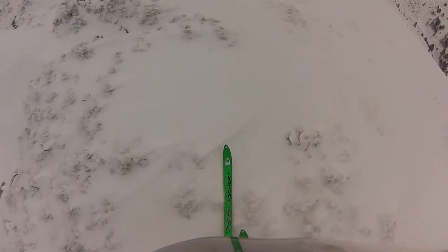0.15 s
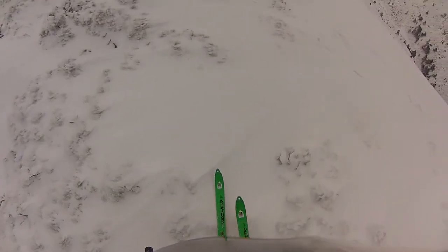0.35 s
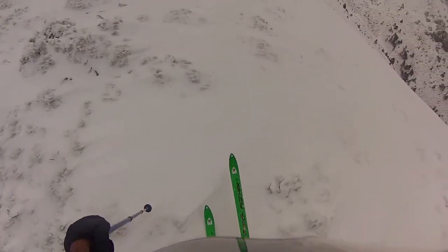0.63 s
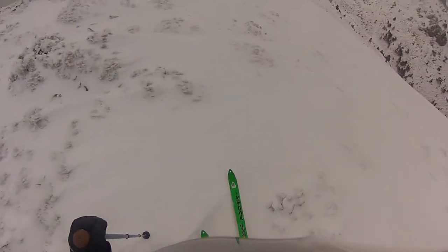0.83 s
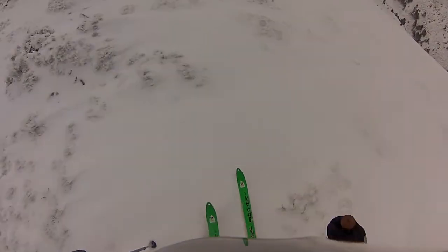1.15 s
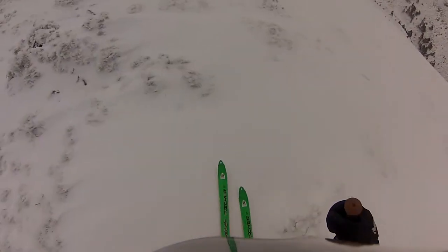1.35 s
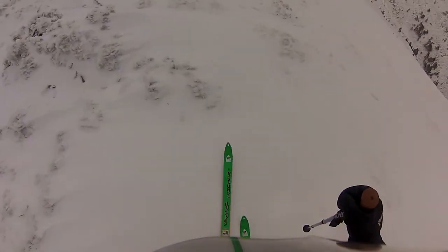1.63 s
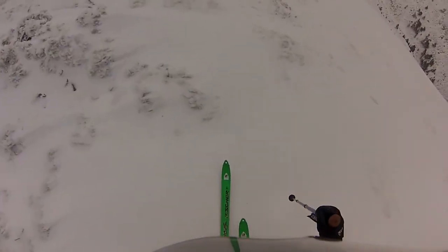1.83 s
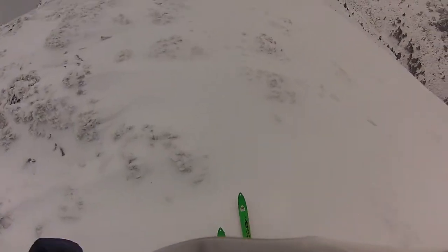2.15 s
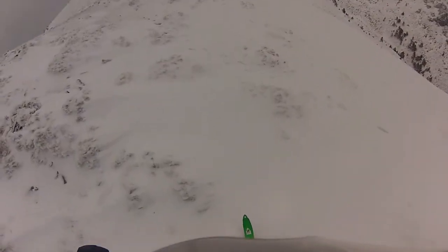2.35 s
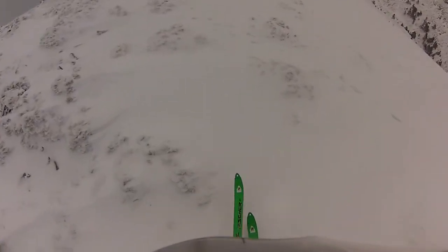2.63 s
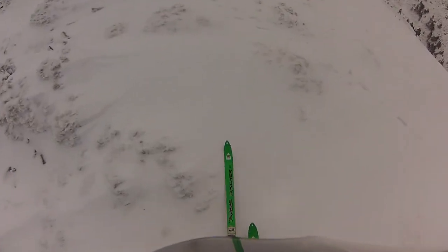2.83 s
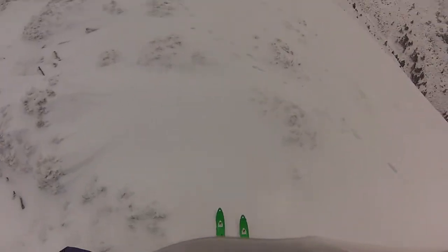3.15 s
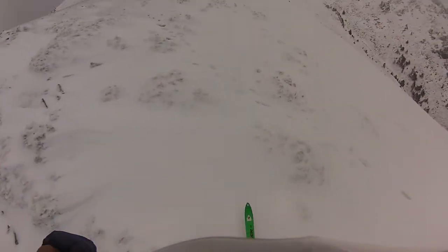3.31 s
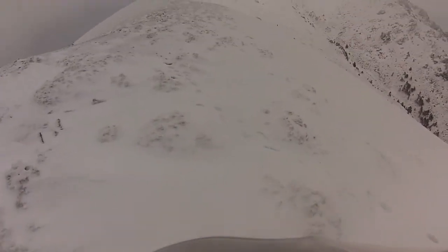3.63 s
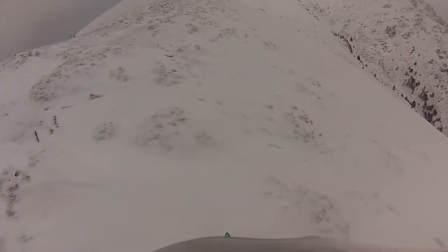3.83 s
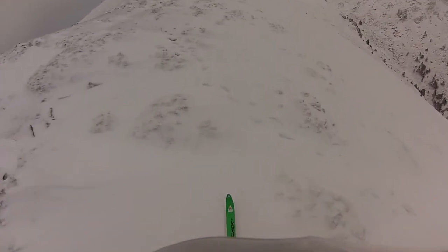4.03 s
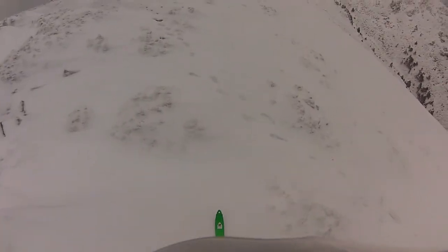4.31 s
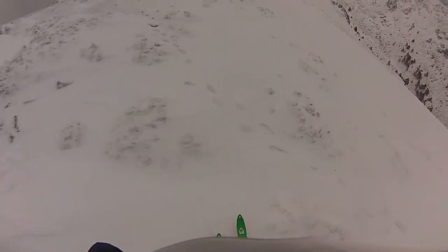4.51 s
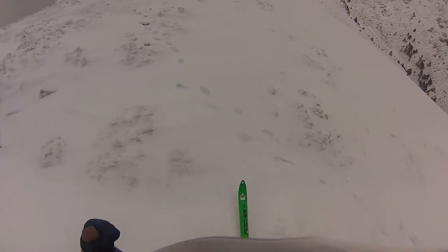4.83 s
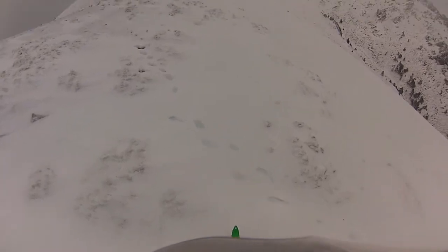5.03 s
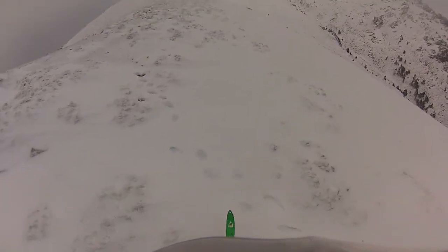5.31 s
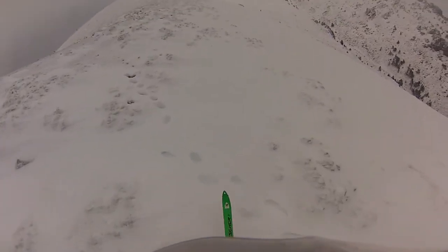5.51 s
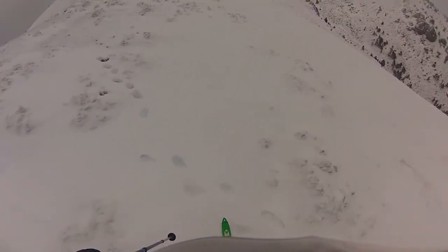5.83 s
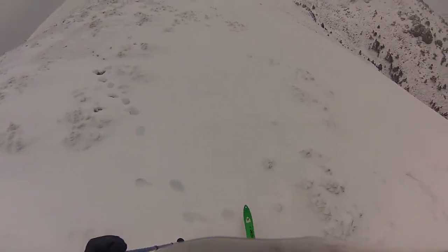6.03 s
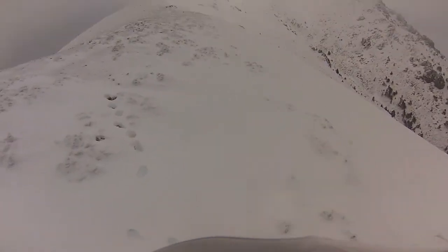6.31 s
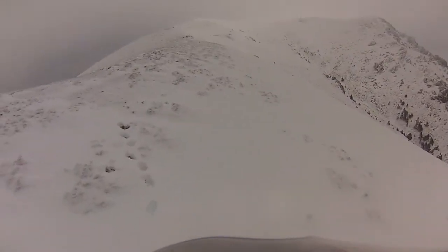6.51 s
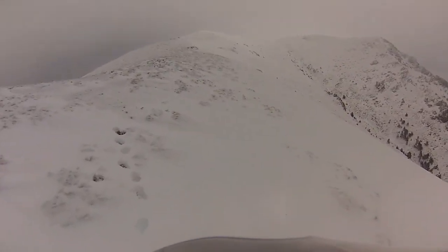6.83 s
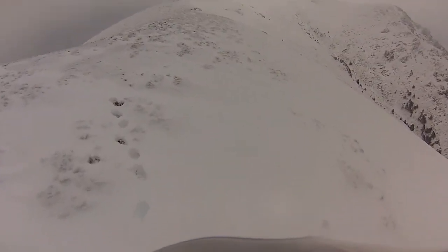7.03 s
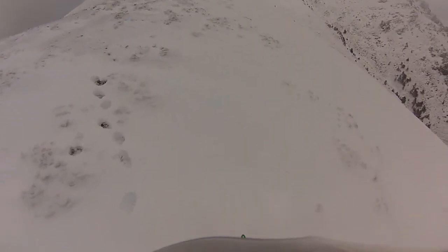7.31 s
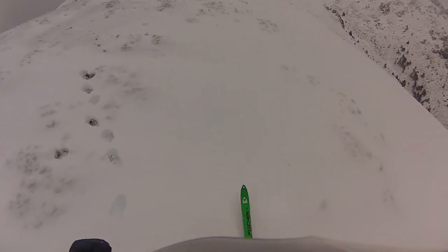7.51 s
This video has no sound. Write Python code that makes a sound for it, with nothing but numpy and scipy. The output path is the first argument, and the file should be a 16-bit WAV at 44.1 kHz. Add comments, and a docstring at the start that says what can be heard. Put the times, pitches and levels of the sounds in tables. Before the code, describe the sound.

Skis crunch and creak over crusted snow in steady strides, with sharp little snaps and low wind buffeting the microphone.

```python
"""A ski tourer climbs crusted snow in twelve strides, heard from a camera worn on the body.
In each stride the ski slides and bites, crunching by stick-slip and grain fracture; then the body
lurches and air buffets the housing. Loose metal gear clacks in the first two strides. From midway
the housing knocks on its mount and a hinge chirps twice; the sharpest crack comes near the end.
Throughout, snow creaks in shear, the crust snaps, footfalls jolt the camera and wind rumbles."""
import sys
import numpy as np
from scipy import signal
from scipy.fft import rfft, irfft, next_fast_len
from scipy.io import wavfile
from scipy.ndimage import uniform_filter1d

SR = 44100
rng = np.random.default_rng(int(sys.argv[2]) if len(sys.argv) > 2 else 0)


def persist_wave(psi):
    """Save psi, clipped to +-1, as 16-bit WAV."""
    counts = np.round(np.clip(psi, -1, 1) * 32767).astype(np.int16)
    wavfile.write(sys.argv[1], SR, np.atleast_2d(counts).T)


N = 337806
TIME = np.arange(N) / SR

# Spectra of the crunch as coloured by the camera housing, and of friction on the ski base: f/Hz, level/dB
CRUNCH_SPECTRUM = [(300, -17.5), (470, -16.5), (590, -5.5), (760, -11), (900, -17.5), (1080, -15),
                   (1240, -3.5), (1520, -1), (1750, -7), (2180, -4.5), (2520, -12.5), (2850, -22)]
HISS_SPECTRUM = [(2850, -18), (3150, -3), (3450, 1.5), (3750, -4.5), (4120, -1), (4450, -13), (5000, -3.5),
                 (5650, -17.5), (6900, -11), (7830, -14.5), (8480, -20), (11500, -17.5), (14700, -27),
                 (16000, -53)]
def skis(grain_db=-1.5, crunch_gain_db=0.08, rub_db=-56, creak_db=-48, dull_above_db=-67, dulling=0.073):
    """Stick-slip and brittle fracture: snow packs in spurts, which also make the ski base hiss."""
    crunch_db, hiss_db = ski_levels()
    packing = spurts(per_s=40, t60=0.12, depth=0.37)
    creaks = squeaks(per_s=120, low_hz=1200, high_hz=2404, swell_s=0.0019, spread_db=2.5, rough=0.079)
    breaks = coloured(grains(per_s=340, spread_db=1), CRUNCH_SPECTRUM)
    crunch = rms_one(coloured(creaks, CRUNCH_SPECTRUM)) + from_db(grain_db) * rms_one(breaks)
    crunch = evened(packing * crunch, window_s=0.067)
    # only a loaded ski makes the snow creak; a light one rubs over it
    rub = rubbing(rate_hz=15, spread_db=2.6, split_hz=1800)
    loaded = np.clip((crunch_db - rub_db) / (creak_db - rub_db), 0.25, 1)
    crunch = np.sqrt(loaded) * crunch + np.sqrt(1 - loaded) * rub
    hiss = coloured(grains(per_s=3500, spread_db=3), HISS_SPECTRUM)
    hiss = from_db(hiss_db) * evened(packing * hiss, window_s=0.14)
    # load presses the snow shut, so the hiss grows duller as it grows louder
    open_share = from_db(-dulling * np.maximum(hiss_db - dull_above_db, 0))
    hiss = open_share * hiss + (1 - open_share) * filtered(hiss, "low", hz=4500, order=1)
    return from_db(crunch_db + crunch_gain_db) * crunch + hiss


# Light rubbing of the unloaded ski: t/s, base level/dB
GLIDE_CURVE = [(0.0, -68), (0.45, -58), (1.71, -54), (2.0, -59), (2.77, -55.5), (4.29, -60), (5.2, -58.5),
               (5.72, -54), (5.87, -56.5), (6.93, -52.5), (7.3, -58), (7.66, -53)]
# Slides and lurches: t/s, slide length/s, rub level/dB, lurch lag/s, buffet level/dB, rumble level/dB
STRIDE_EVENTS = [(0.142, 0.14, -56.5, 0.052, -34, -39), (0.774, 0.086, -55.5, 0.17, -33, -45.5),
                 (1.433, .25, -56, 0.062, -37.5, -47), (2.216, 0.24, -55, 0.08, -29, -37),
                 (2.845, 0.15, -52.5, 0.066, -33, -36.5), (3.445, 0.14, -55, 0.125, -26.5, -37.5),
                 (4.03, 0.14, -57, 0.16, -28.5, -37), (4.811, 0.09, -52, 0.075, -24.5, -38),
                 (5.601, 0.16, -51, 0.11, -24, -34), (6.219, 0.086, -49.5, 0.11, -25.5, -35.5),
                 (6.742, 0.42, -56, 0.11, -32, -37.5), (7.56, .08, -62, 0.089, -40.5, -45)]
# The loaded ski bites into the snow: t/s, length/s, crunch level/dB, hiss level/dB
SKI_BITES = [(0.008, 0.011, -41.5, -53.5), (0.744, 0.013, -52, -58), (0.895, 0.026, -52.5, -66),
             (1.414, 0.023, -52, -63), (1.484, 0.031, -51, -61.5), (1.582, 0.025, -58.5, -61.5),
             (1.638, 0.015, -52, -70), (1.797, 0.089, -55.5, -67), (2.241, 0.07, -49.5, -61),
             (2.391, 0.019, -48, -64), (2.852, 0.047, -45, -54.5), (3.45, 0.053, -52.5, -71),
             (3.503, 0.064, -48.5, -58), (3.637, 0.016, -48.5, -64), (4.056, 0.03, -49, -61.5),
             (4.138, 0.11, -52, -64), (4.35, 0.078, -59.5, -72), (4.788, 0.079, -49.5, -61.5),
             (5.39, 0.011, -52, -67), (5.489, 0.05, -51.5, -67), (5.674, 0.023, -43, -54),
             (6.194, 0.019, -45, -69), (6.31, 0.022, -44, -57.5), (6.411, 0.037, -47.5, -68),
             (6.785, 0.099, -50.5, -65), (6.847, 0.063, -52.5, -71), (6.943, 0.041, -49, -78),
             (7.591, 0.032, -49, -56.5)]
def ski_levels(slide_hiss_db=-12.5):
    """Friction noise follows load: the loudest of glide, slide and bite sets crunch and hiss, in dB."""
    glide_db = in_time(GLIDE_CURVE)
    crunch, hiss = glide_db - 3.5, glide_db - 16.5
    for s, length_s, rub_db, *_ in STRIDE_EVENTS:
        slide = rub_db + swell(s, length_s, rise_db_per_s=186, fall_db_per_s=118)
        crunch, hiss = np.maximum(crunch, slide), np.maximum(hiss, slide + slide_hiss_db)
    for s, length_s, crunch_db, hiss_db in SKI_BITES:
        load = swell(s, length_s, rise_db_per_s=900, fall_db_per_s=382)
        crunch, hiss = np.maximum(crunch, crunch_db + load), np.maximum(hiss, hiss_db + load)
    return crunch, hiss


def spurts(per_s, t60, depth):
    """Relaxation: snow yields in spurts that start at once and decay, over a steady share."""
    starts = np.abs(grains(per_s, spread_db=4.5))
    return 1 + depth * signal.lfilter([1], [1, -from_db(-60 / (t60 * SR))], starts)


def squeaks(per_s, low_hz, high_hz, swell_s, spread_db, rough):
    """Stick-slip locks onto a pitch for milliseconds: a random stream of tiny squeaks."""
    out, t = np.zeros(N), TIME[:SR // 30]
    for when, pitch, length, strength in rng.random((int(per_s * N / SR), 4)):
        hz = low_hz * (high_hz / low_hz) ** pitch
        squeak = tone_burst(t, hz, swell_s * 2 ** (2 * length - 1), rough)
        add(out, when * N / SR, from_db(-spread_db * np.log(strength + 0.02)) * squeak)
    return rms_one(out)


def rubbing(rate_hz, spread_db, split_hz):
    """Sliding friction: as the ski meets new snow, the low and high bands swell and fade separately."""
    rub = coloured(grains(per_s=5000, spread_db=2), CRUNCH_SPECTRUM)
    low = filtered(rub, "low", split_hz, order=3) * from_db(spread_db * drift(rate_hz))
    high = filtered(rub, "high", split_hz, order=3) * from_db(spread_db * drift(rate_hz))
    return rms_one(low + high)


# Snow gives way under the ski: t/s, peak level/dB, f/Hz, t60/s
SNOW_SLIPS = [(0.074, -42, 1480, 0.046), (0.42, -41.5, 1400, 0.12), (0.776, -45.5, 1450, 0.05),
              (0.791, -40, 1530, 0.06), (0.888, -36.5, 1650, 0.036), (1.483, -37, 1587, 0.08),
              (1.628, -38, 1640, 0.05), (2.146, -45, 2120, 0.045), (2.677, -43.5, 2100, 0.045),
              (2.762, -40, 1490, 0.054), (2.886, -33, 1560, 0.076), (3.263, -44, 2180, 0.12),
              (3.332, -42, 1380, 0.054), (3.430, -40, 1490, 0.039), (3.502, -35, 1300, 0.037),
              (3.524, -37.5, 1890, 0.05), (3.574, -36.5, 3460, .06), (4.013, -39.5, 1460, 0.088),
              (4.06, -41, 2060, 0.093), (4.117, -28, 1586, 0.036), (4.159, -35.5, 1844, 0.077),
              (4.700, -36.5, 1340, 0.082), (4.783, -42.5, 1860, 0.042), (4.816, -38, 1280, 0.09),
              (4.872, -39, 1495, 0.088), (5.47, -40.5, 1525, 0.059), (5.609, -39, 1440, 0.06),
              (5.674, -38, 1330, 0.085), (5.699, -34.5, 1980, 0.019), (6.095, -36.5, 1475, 0.072),
              (6.312, -35.5, 1490, 0.071), (6.412, -37.5, 1390, 0.11), (6.780, -37.5, 1573, 0.099),
              (7.24, -36, 1540, 0.022), (7.399, -42.5, 1370, 0.084), (7.586, -40, 1450, 0.095),
              (7.636, -38, 1490, 0.043)]
# Spectrum of the dull creak: f/Hz, level/dB
CREAK_SPECTRUM = [(550, -13), (950, -28), (1120, -26), (1300, -22), (1600, 9), (2200, 10), (2850, -5.5),
                  (3450, -6.5), (5000, -20.5), (7000, -38)]
def slips(swell_share=0.049, first_jerk=1.6, rasp_db=-13):
    """Shear failure: a layer slips with a jerk and a squeak, then smaller jerks rasp on the ski base."""
    out, t = np.zeros(N), TIME[:SR // 10]
    for s, db, hz, t60 in SNOW_SLIPS:
        jerks = grains(per_s=1500, spread_db=3.5, size=len(t)) * dying(t, t60)
        jerks[0] += first_jerk
        creak = struck(jerks, CREAK_SPECTRUM) + struck(jerks, HISS_SPECTRUM, rasp_db)
        squeak = tone_burst(t, hz, swell_share * t60, rough=0.078)
        add(out, s, from_db(db) * peak_one(squeak + creak))
    return out


# The crust snaps: t/s, crack level/dB, body level re crack before its boost/dB, body f/Hz, crumb t60/s
CRUST_SNAPS = [(0.5574, -65.5, 15.5, 4900, 0.031), (0.633, -41.5, -13.5, 3400, 0.018),
               (0.643, -46, -10, 2500, 0.012), (0.7915, -43, -16, 4700, 0.014),
               (0.7997, -40.5, -13, 4720, 0.016), (0.8207, -42, -18, 3400, 0.012),
               (0.9029, -31.5, -9, 2700, 0.015), (1.358, -46, -21, 4780, 0.055),
               (1.648, -42, -11.5, 3330, 0.1), (1.7937, -35, -10.5, 3400, 0.011),
               (1.8655, -33.5, -2, 3470, 0.009), (1.9333, -46, -10, 4620, 0.021),
               (1.952, -46, -12, 4800, 0.03), (1.968, -44, -5.5, 3360, 0.075),
               (2.1096, -51, -4, 5000, 0.016), (2.1752, -35.5, -12, 2200, 0.021),
               (2.2656, -40, -6, 3400, 0.048), (2.7192, -37.5, -5.5, 3420, 0.017),
               (2.7668, -45, -6, 5100, 0.031), (2.9894, -39.5, -2, 3440, 0.012),
               (3.052, -31.5, -10, 3380, 0.0079), (3.13, -47.5, -10, 3590, 0.028),
               (3.269, -48, -4.5, 4500, 0.038), (3.404, -50.5, -4, 4800, 0.03), (3.574, -58, 4, 3460, 0.06),
               (3.681, -43.5, -1.5, 3700, 0.055), (4.02, -45, -13, 3520, 0.025),
               (4.42, -46.5, -9, 3460, 0.13), (4.567, -38.5, -4, 5360, 0.024),
               (5.153, -53.5, -4, 4900, 0.04), (5.174, -42.5, -15, 3570, 0.013),
               (5.2399, -32.5, -8, 3270, 0.0071), (5.2483, -47, -6, 4800, 0.012),
               (5.347, -43.5, -10, 3270, 0.011), (5.745, -50, 6, 3450, 0.0085),
               (5.7805, -44, -6, 3450, 0.046), (5.906, -43.5, -5, 3400, 0.017),
               (5.9645, -41, -13, 3410, 0.011), (6.056, -43, -9.5, 5070, 0.036),
               (6.122, -45, -22, 3670, 0.027), (6.181, -49.5, 0.5, 4430, 0.012),
               (6.371, -44.5, -9, 3400, 0.012), (6.4638, -22.5, -31, 2050, 0.012),
               (6.5156, -49, -5, 3460, 0.025), (6.7195, -44.5, -1, 4150, 0.017),
               (6.773, -49.5, -1.5, 4700, 0.031), (7.066, -51, -1, 3820, 0.02),
               (7.1493, -32, -4, 3460, 0.0079), (7.246, -42.5, -5, 5000, 0.024),
               (7.566, -41.5, -9, 3370, 0.016)]
# Spectra of a snap's body and of its bright crack: f/Hz, level/dB
BODY_SPECTRUM = [(600, -15), (1100, -28), (1500, -25), (2500, 3), (2900, -5.5), (3350, 0), (4200, -6),
                 (4900, 1), (5700, -12), (8000, -12)]
CRACK_SPECTRUM = [(3000, -24), (5500, -13), (6900, -3.5), (7900, -5), (8800, -9.5), (9700, -7.5),
                  (12000, -9), (15000, -22)]
def snaps(travel_s=0.0014, splinter_db=-1, crumb_db=-11, body_boost_db=9.5, knock_db=-14, lag_s=0.0006):
    """Brittle fracture: a crack runs through the crust and knocks on the ski, then crumbs scatter."""
    out, t = np.zeros(N), TIME[:SR // 10]
    # dispersion: the crust carries treble faster than bass, so the break arrives as a falling sweep
    sweep = (t < travel_s) * np.cos(np.pi * SR * t * (1 - t / (2 * travel_s)))
    for s, db, body_db, hz, t60 in CRUST_SNAPS:
        splinters = from_db(splinter_db) * rng.standard_normal(len(t)) * dying(t, t60=0.0053)
        crack = sweep + splinters
        crumbs = grains(per_s=5400, spread_db=6.5, size=len(t)) * dying(t, t60)
        force = crack + from_db(crumb_db) * crumbs
        resonance = peaked(BODY_SPECTRUM, hz, peak_db=9.5, octaves=0.16)
        add(out, s + lag_s, struck(force, CRACK_SPECTRUM, db))
        add(out, s + lag_s, struck(force, resonance, db + body_db + body_boost_db))
        add(out, s + lag_s, struck(crack[:SR // 50], CREAK_SPECTRUM, db + knock_db))
    return out


# Footfalls: t/s, shudder level/dB, shudder f/Hz, lump level re shudder/dB
FOOTFALLS = [(0.012, -45, 110, 14), (0.19, -38, 123, -17), (0.915, -39, 86.5, -1.5), (1.482, -42, 113, 0),
             (2.390, -34.5, 97, -6.5), (2.885, -42, 95, 4), (3.502, -32.5, 85, 2), (3.543, -36, 138, -7),
             (3.623, -32, 111.6, -11), (4.232, -32, 105, -21), (4.876, -42.5, 102, 1),
             (5.654, -26, 112.7, -14.5), (6.334, -32.5, 124, -9), (6.428, -35, 85, -9)]
def jolts(t60=0.093, shake_db=-7, mount_t60=0.12, rise_s=0.01, upper_hz=195, upper_db=-11):
    """Damped oscillation: a footfall shakes the camera on its springy mount and breaks lumps of crust."""
    out, t = np.zeros(N), TIME[:SR // 4]
    for s, db, hz, lumps_db in FOOTFALLS:
        modes = np.sin(2 * np.pi * hz * t) + from_db(upper_db) * np.sin(2 * np.pi * upper_hz * t)
        shudder = modes * dying(t, mount_t60) * (1 - np.exp(-t / rise_s))
        shake = filtered(rng.standard_normal(len(t)) * dying(t, t60), "low", hz=300, order=1)
        lumps = grains(per_s=820, spread_db=3, size=len(t)) * dying(t, t60)
        add(out, s, from_db(db) * (peak_one(shudder) + struck(shake, RUMBLE_SPECTRUM, shake_db)))
        add(out, s, struck(lumps, CRUNCH_SPECTRUM, db + lumps_db))
    return out


# The housing hits its mount as the ski lands: t/s, peak level/dB
HOUSING_KNOCKS = [(3.503, -33), (3.555, -32.5), (3.634, -42), (4.2428, -31.5), (4.2497, -33.5),
                  (5.621, -34.5), (5.6293, -36.5), (5.639, -34), (6.279, -34), (6.3406, -29.5),
                  (6.3445, -35), (6.3579, -35), (6.3618, -32), (6.3672, -44), (6.394, -35.5),
                  (6.432, -34.5)]
def knocks(body_hz=170, t60=0.007, edge_hz=5000):
    """Impact: the housing slips and stops dead, making a pressure step that dies within one swing."""
    out, t = np.zeros(N), TIME[:SR // 20]
    step = np.cos(2 * np.pi * body_hz * t) * dying(t, t60)
    knock = peak_one(filtered(step, "low", edge_hz, order=1))
    for s, db in HOUSING_KNOCKS:
        add(out, s, from_db(db) * knock)
    return out


# Poles and bindings clack: t/s, peak level/dB, rattle t60/s, ring level re peak/dB
GEAR_CLACKS = [(0.1275, -35, .12, -19), (1.056, -34.5, 0.14, -31), (1.126, -40, 0.022, -37)]
# Spectrum of one contact: f/Hz, level/dB
CONTACT_SPECTRUM = [(1000, -5), (2000, 6.5), (3000, 1), (4800, 4.5), (6500, -1), (8500, -3), (11000, 2.5),
                    (14000, -8), (16000, -12)]
# Modes of the metal: f/Hz, level/dB, t60/s
METAL_MODES = [(3620, -5, 0.35), (4190, -9, 0.55), (4750, -4.5, 0.28), (4980, -6, .25), (5300, -4, .2),
               (6270, -15.5, 0.32), (7472, -15, .3), (7970, -9, 0.42)]
def gear(bounce_s=0.0028, contact_t60=0.0052, scrape_db=-13, ring_flutter=0.6):
    """Modal ringing: loose metal chatters in a dying run of contacts, scrapes between them and rings on."""
    out, t = np.zeros(N), TIME[:SR // 2]
    for s, db, t60, ring_db in GEAR_CLACKS:
        force = np.full(len(t), from_db(scrape_db))
        gaps = bounce_s * rng.uniform(0.6, 1.4, size=6)
        for at in np.cumsum(gaps) - gaps[0]:
            force += (t >= at) * dying(np.abs(t - at), contact_t60)
        force *= dying(t, t60) * rng.standard_normal(len(t))
        add(out, s, struck(force, CONTACT_SPECTRUM, db))
        for hz, mode_db, mode_t60 in METAL_MODES:
            mode = np.sin(2 * np.pi * hz * t) * dying(t, mode_t60)
            ring = peak_one(signal.fftconvolve(force, mode)[:len(t)])
            flutter = 1 + ring_flutter * drift(rate_hz=70)[:len(t)]
            add(out, s, from_db(db + ring_db + mode_db) * ring * flutter)
    return out


# A binding hinge chirps: t/s, peak level/dB
HINGE_CHIRPS = [(3.55, -64), (4.145, -61.5)]
def hinge(hz=8660):
    """Stick-slip: a dry hinge under load gives a short, high tone."""
    out, t = np.zeros(N), TIME[:SR // 2]
    for s, db in HINGE_CHIRPS:
        add(out, s, from_db(db) * tone_burst(t, hz, swell_s=0.017, rough=0.032))
    return out


def loose_crystals(body_db=-74, bright_db=-80, rattle_t60=0.013):
    """Shot noise: stray bits of ice land at random and rattle faintly on the skis."""
    falls = np.abs(grains(per_s=50, spread_db=1))
    envelope = signal.fftconvolve(falls, dying(TIME[:SR // 20], rattle_t60))[:N]
    ticks = envelope * rng.standard_normal(N)
    body = from_db(body_db) * rms_one(coloured(ticks, BODY_SPECTRUM))
    return body + from_db(bright_db) * rms_one(coloured(ticks, CRACK_SPECTRUM))


def thumps(hz=33, swell_s=0.032):
    """Dynamic pressure: at the height of each lurch, air pushes on the housing in one deep thump."""
    out, t = np.zeros(N), TIME[:SR // 2]
    for s, _, _, lag_s, buffet_db, _ in STRIDE_EVENTS:
        add(out, s + lag_s - swell_s, from_db(buffet_db) * tone_burst(t, hz, swell_s, rough=0.04))
    return out


# Spectra of slow pressure swings, deep thuds, rumble and steady air hiss: f/Hz, level/dB
SWAY_SPECTRUM = [(3, -12.5), (6, -1), (10, 0.5), (15, -8.5)]
THUD_SPECTRUM = [(22, -1.5), (33, -3.5), (42, -12), (60, -11.5)]
RUMBLE_SPECTRUM = [(45, -15), (58, -11.5), (80, -5.5), (105, -3.5), (135, -15.5), (163, -21), (200, -25.5),
                   (300, -29.5), (457, -37.5), (700, -38), (900, -47)]
AIR_SPECTRUM = [(200, 8.5), (600, -5.5), (1000, -9.5), (1500, -14), (2900, -15), (5000, -16.5), (8000, -20),
                (12000, -20.5), (13500, -23), (16000, -39)]
def wind(sway_gain_db=12.5, thud_gain_db=-2, rumble_gain_db=-0.5, split_hz=175, rush_share=0.66):
    """Turbulence: pressure on the housing sways, thuds and rumbles with each stride, over a faint hiss."""
    buffet_db, rumble_db, calm_db = wind_levels()
    sway = from_db(sway_gain_db) * evened(noise(SWAY_SPECTRUM), window_s=0.2)
    thud = from_db(thud_gain_db) * evened(noise(THUD_SPECTRUM), window_s=0.025)
    buffet = filtered(from_db(buffet_db) * (sway + thud), "low", hz=70, order=4)
    lumpy = rng.standard_normal(N) * from_db(3.5 * drift(rate_hz=22))
    rumble = evened(coloured(lumpy, RUMBLE_SPECTRUM), window_s=0.071)
    # a gust swells mostly in the bass: the rush above it takes only a share of the swing in dB
    rush_db = calm_db + rush_share * (rumble_db - calm_db)
    bass = from_db(rumble_db) * filtered(rumble, "low", split_hz, order=3)
    rush = from_db(rush_db) * filtered(rumble, "high", split_hz, order=3)
    air = from_db(-63) * rms_one(noise(AIR_SPECTRUM))
    return buffet + from_db(rumble_gain_db) * (bass + rush) + air


# The breeze under the strides: t/s, base level/dB
BREEZE_CURVE = [(0.0, -46), (0.34, -46.5), (0.89, -53), (1.6, -45.5), (2.1, -49.5), (2.67, -47.5),
                (3.33, -51), (4.1, -45.5), (4.65, -50.5), (5.42, -49), (5.87, -49), (6.6, -49), (7.25, -47),
                (7.66, -53.5)]
# Puffs of wind between the lurches: t/s, buffet level/dB, rumble level/dB
WIND_GUSTS = [(0.43, -40, -46), (1.09, -34.5, -46.5), (1.23, -42, -38.5), (1.86, -36.5, -40.5),
              (2.44, -33, -44), (2.82, -48, -36.5), (3.06, -37.5, -36.5), (3.89, -45, -38.5),
              (6.08, -37, -42), (6.22, -34.5, -38), (6.45, -34, -38.5), (6.69, -33, -39),
              (6.89, -35, -37.5), (7.09, -31.5, -40.5)]
def wind_levels():
    """Flow noise follows airspeed: lurches and gusts lift buffet and rumble above the breeze, in dB."""
    breeze_db = in_time(BREEZE_CURVE)
    buffet, calm = breeze_db + 5, breeze_db + 2.5
    rumble = calm
    lurches = [(s + lag_s, *levels) for s, _, _, lag_s, *levels in STRIDE_EVENTS]
    for s, buffet_db, rumble_db in lurches + list(WIND_GUSTS):
        buffet = np.maximum(buffet, buffet_db + swell(s, 0, rise_db_per_s=110, fall_db_per_s=89))
        rumble = np.maximum(rumble, rumble_db + swell(s, 0, rise_db_per_s=72.5, fall_db_per_s=72.5))
    return buffet, rumble, calm


def grains(per_s, spread_db, size=N):
    """Poisson impulses: ice bonds break at random moments, most weakly and a few strongly."""
    strength = from_db(spread_db * np.minimum(rng.exponential(1, size), 4))
    return (rng.random(size) < per_s / SR) * strength * rng.choice([-1, 1], size)


def tone_burst(t, hz, swell_s, rough):
    """Phase diffusion: a tone wavers by a random walk as it swells to a peak at swell_s and fades."""
    cycles = hz * t + rough * np.cumsum(rng.standard_normal(len(t))) * np.sqrt(hz / SR)
    age = t / max(swell_s, 2e-4)
    return (age * np.exp(1 - age)) ** 2 * np.sin(2 * np.pi * cycles)


def drift(rate_hz, hop=40, settle=2000):
    """Low-passed noise: a slow random curve of rms 1, drawn once every hop samples."""
    pole = np.exp(-2 * np.pi * hop * rate_hz / SR)
    white = rng.standard_normal(N // hop + settle + 2)
    slow = signal.lfilter([1], [1, -2 * pole, pole * pole], white)[settle:]
    return np.interp(np.arange(N) / hop, np.arange(len(slow)), rms_one(slow))


def coloured(x, spectrum):
    """Minimum-phase filter: x passes through a body whose spectrum falls 48 dB/octave past its ends."""
    size = 2 * next_fast_len(len(x) * 3 // 5)
    hz, db = np.transpose(spectrum)
    octave = np.log2(np.maximum(np.arange(size // 2 + 1) * SR / size, 1))
    beyond = np.abs(octave - np.clip(octave, np.log2(hz[0]), np.log2(hz[-1])))
    shape_db = np.maximum(np.interp(octave, np.log2(hz), db) - 48 * beyond, -100)
    # folding the cepstrum onto positive time makes the response causal
    cepstrum = irfft(np.log(from_db(shape_db)))
    cepstrum[1:size // 2] *= 2
    cepstrum[size // 2 + 1:] = 0
    return irfft(rfft(x, size) * np.exp(rfft(cepstrum)))[:len(x)]


def struck(force, spectrum, peak_db=0):
    """Forced response of a body, scaled to a peak level."""
    return from_db(peak_db) * peak_one(coloured(force, spectrum))


def noise(spectrum):
    """Gaussian noise shaped by a spectrum."""
    return coloured(rng.standard_normal(N), spectrum)


def peaked(spectrum, hz, peak_db, octaves):
    """Resonance: a spectrum with one peak added at hz."""
    points, db = np.transpose(spectrum)
    fine = np.geomspace(points[0], points[-1], 120)
    bump = peak_db / (1 + (np.log2(fine / hz) / octaves) ** 2)
    return np.column_stack([fine, np.interp(np.log(fine), np.log(points), db) + bump])


def filtered(x, kind, hz, order):
    """Maximally flat low-pass or high-pass."""
    return signal.sosfilt(signal.butter(order, hz, kind, fs=SR, output="sos"), x)


def evened(x, window_s):
    """Running normalisation: hold the rms at 1 over the window, leaving finer grain alone."""
    power = uniform_filter1d(x ** 2, int(window_s * SR))
    return x / np.sqrt(np.maximum(power, 0) + 1e-4 * np.mean(x ** 2))


def swell(start, hold_s, rise_db_per_s, fall_db_per_s):
    """Attack, hold and release, in dB re the top."""
    before, after = np.maximum(start - TIME, 0), np.maximum(TIME - start - hold_s, 0)
    return -rise_db_per_s * before - fall_db_per_s * after


def dying(t, t60):
    """Exponential decay of 60 dB in t60."""
    return np.exp(-np.log(1000) * t / t60)


def from_db(db):
    """Decibels to gain."""
    return 10 ** (np.asarray(db) / 20)


def rms_one(x):
    """Scale to an rms of 1."""
    return x / np.sqrt(np.mean(x ** 2) + 1e-20)


def peak_one(x):
    """Scale to a peak of 1."""
    return x / (np.abs(x).max() + 1e-20)


def in_time(curve):
    """Linear interpolation of a curve at every sample."""
    return np.interp(TIME, *np.transpose(curve))


def add(out, s, sound):
    """Mix a sound in from time s."""
    at = int(np.clip(s * SR, 0, N - 1))
    out[at:at + len(sound)] += sound[:N - at]


def scene():
    """Superposition in a free field: open snow gives no echo, so the sources add dry."""
    snow = skis() + slips() + snaps() + loose_crystals()
    equipment = gear() + hinge() + jolts() + knocks()
    return (snow + equipment + thumps() + wind())[None, :]


def record(dry, cutoff_hz=16300):
    """Band limiting: an elliptic low-pass cuts the top steeply."""
    return signal.sosfilt(signal.ellip(10, 0.1, 80, cutoff_hz, fs=SR, output="sos"), dry)


dry = scene()
out = record(dry)
persist_wave(out)
```